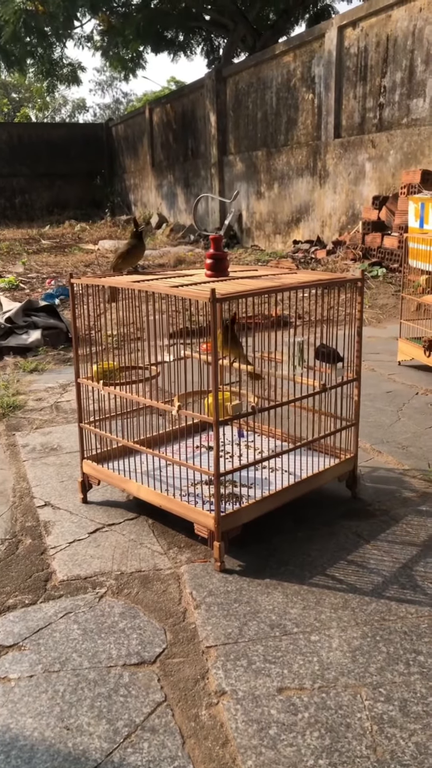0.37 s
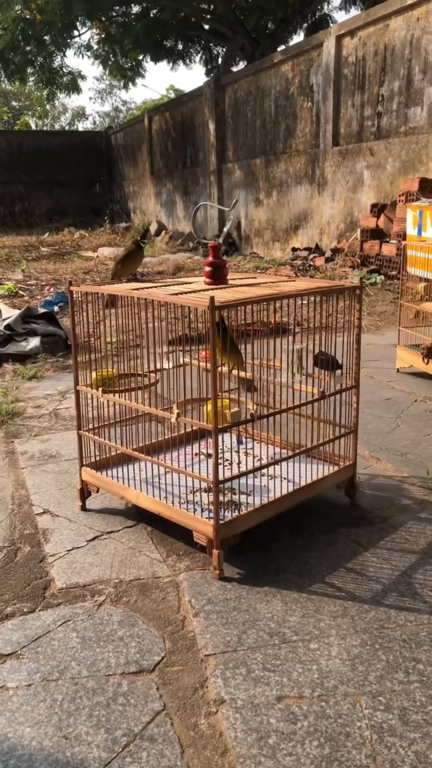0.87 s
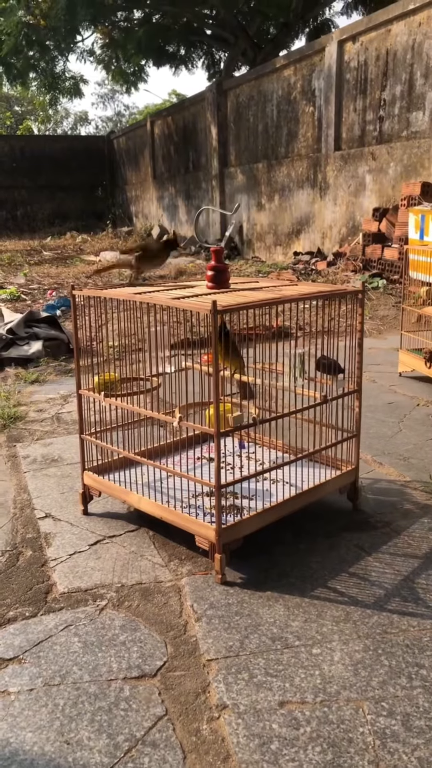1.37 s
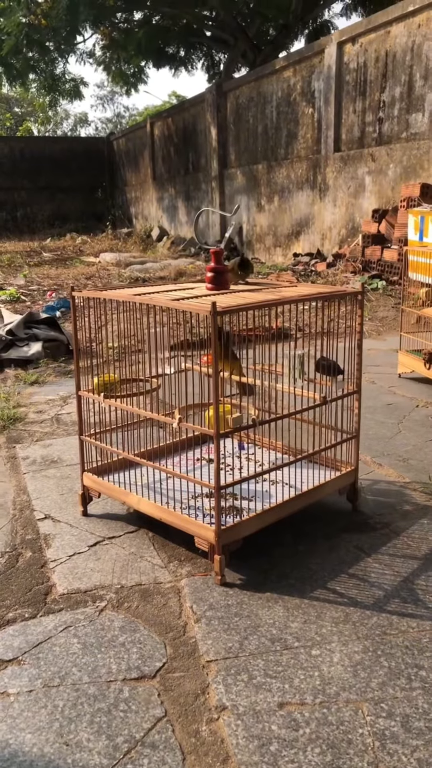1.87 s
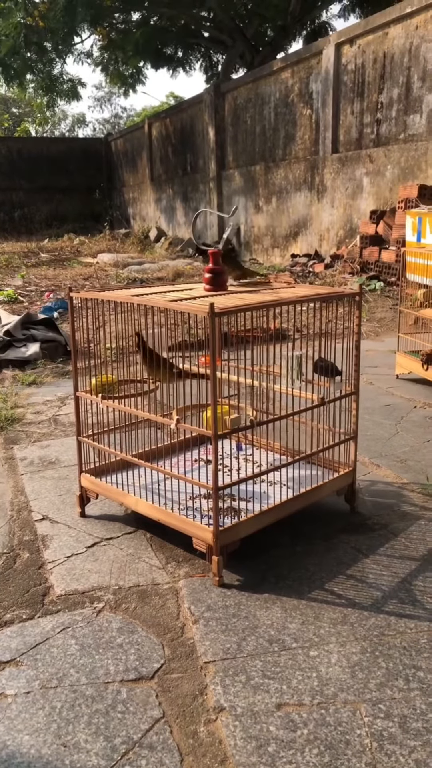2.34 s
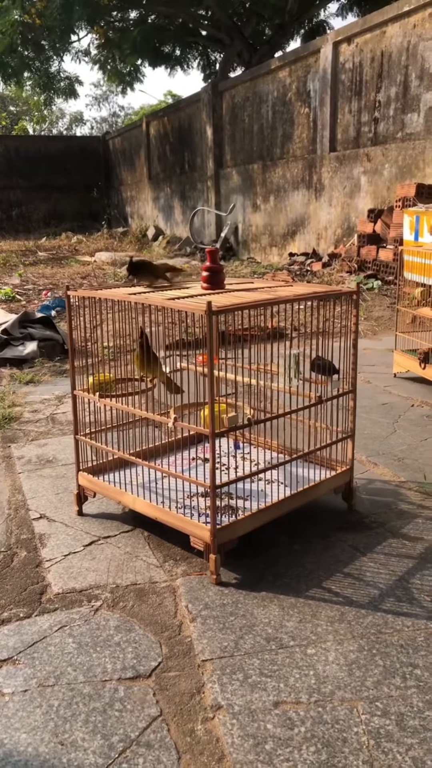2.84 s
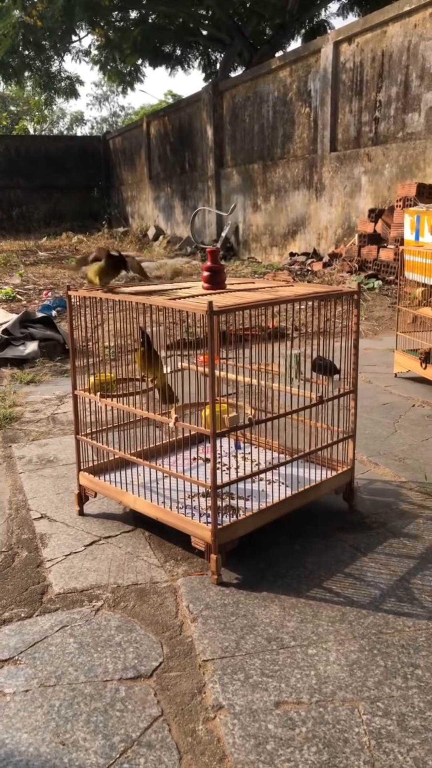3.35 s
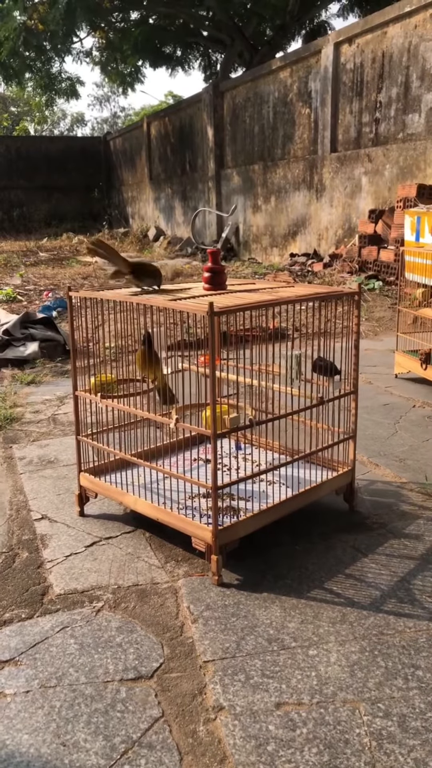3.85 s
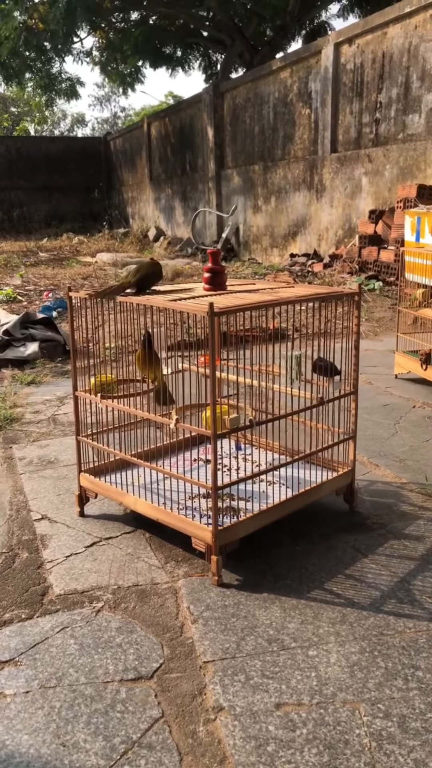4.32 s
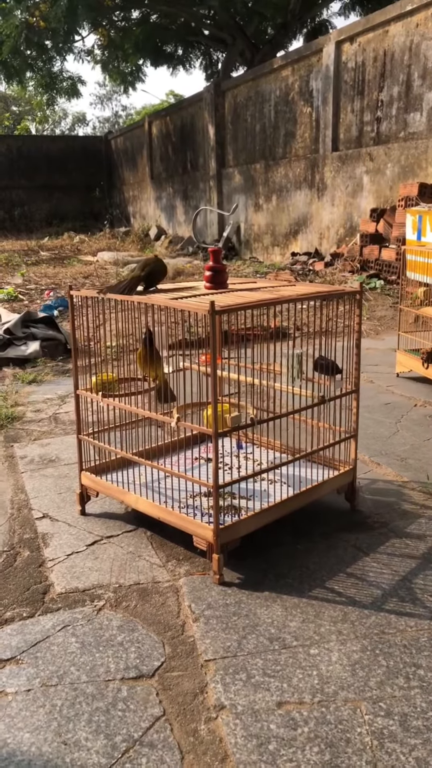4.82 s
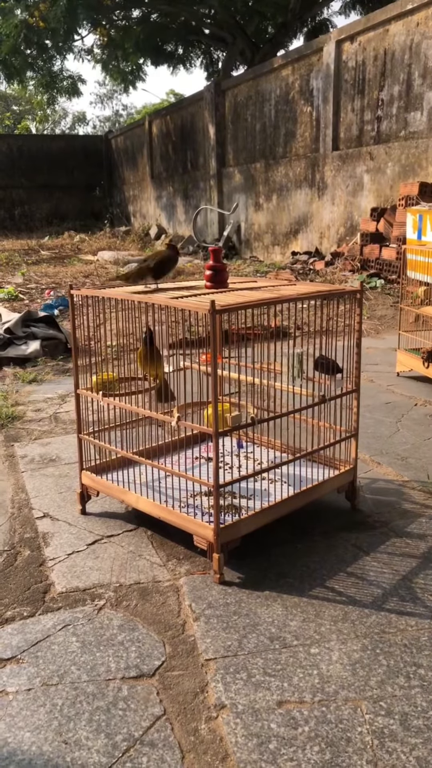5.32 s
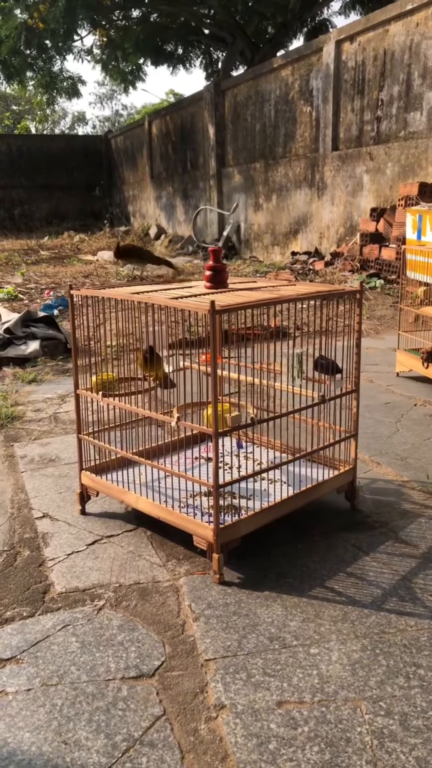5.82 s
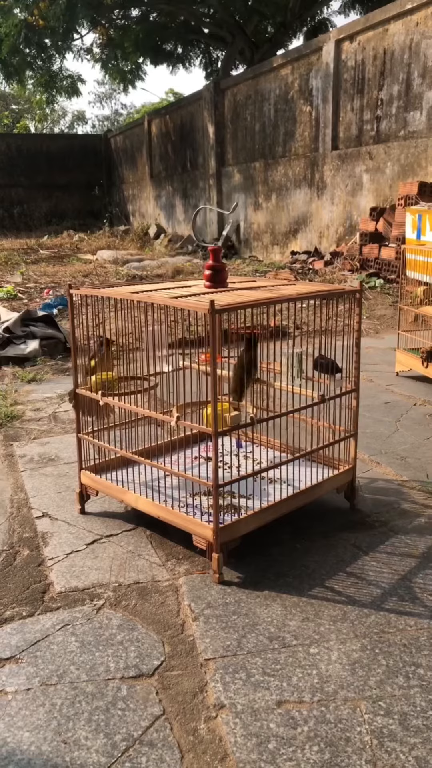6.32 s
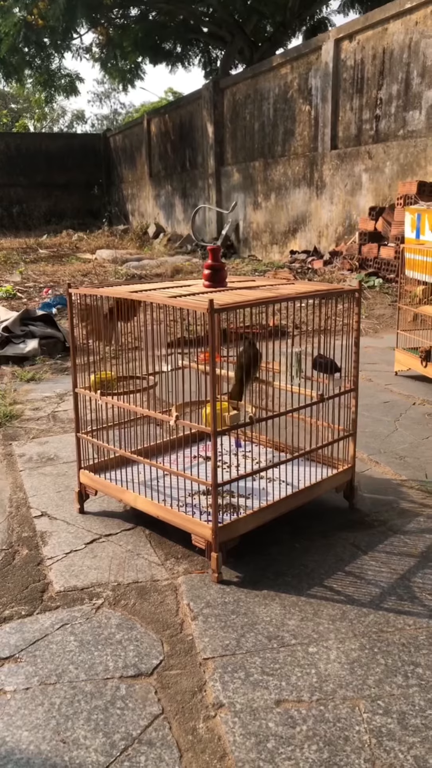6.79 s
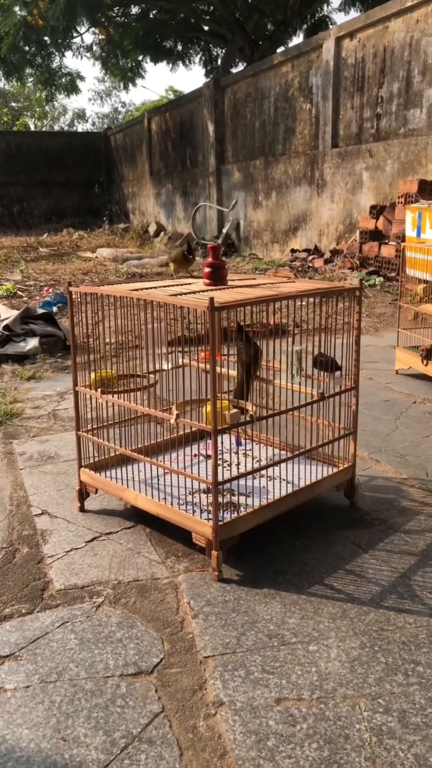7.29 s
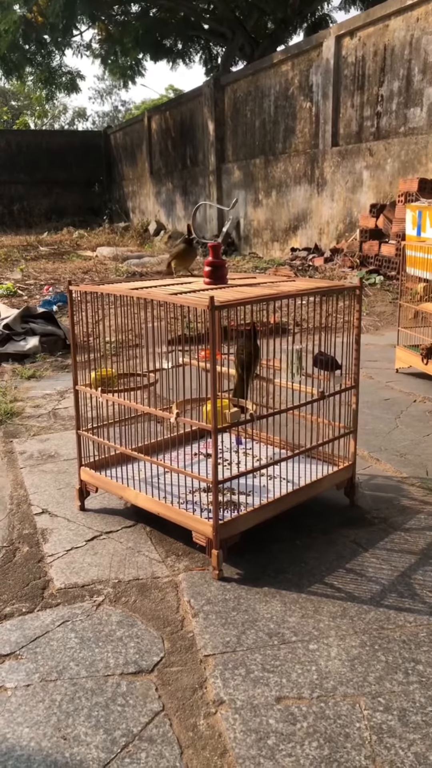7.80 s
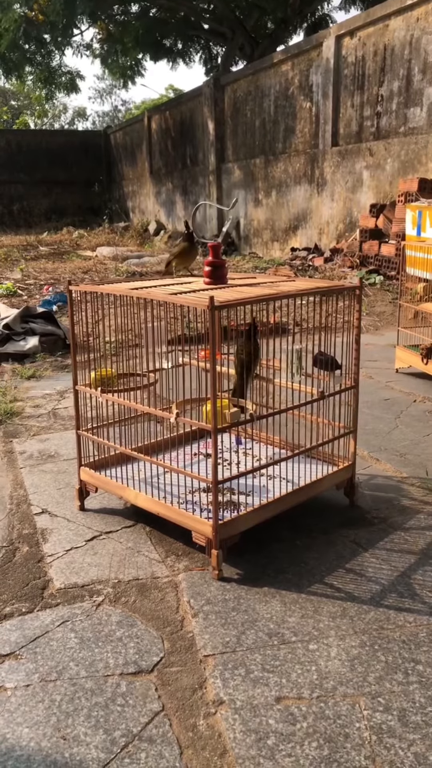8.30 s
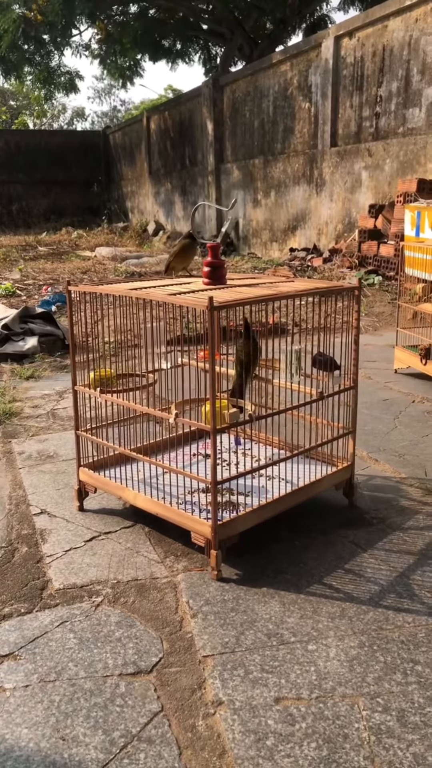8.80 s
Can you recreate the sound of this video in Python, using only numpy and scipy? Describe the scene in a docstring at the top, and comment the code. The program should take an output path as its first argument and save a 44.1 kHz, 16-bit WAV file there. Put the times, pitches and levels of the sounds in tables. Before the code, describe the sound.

Two songbirds at a cage in a paved, walled yard, heard from a few metres away. At 0-0.4 s a loud, rapid tumble of clear whistles sweeps up and down, with a soft wing thump near the end. After a pause, bubbling phrases return around 1.2-1.7 s, then only weak notes until 2.5. Short chirrups follow at 2.5-3.2, single quick calls near 3.2 and 3.55, and a phrase at 3.9-4.2. Tiny husky chips come from a far bird at 4.2-4.6. A strong liquid run fills 4.7-5.4, then faint notes and slight wing flutters until 6.9. Calls revive at 7.2-7.7 and a dense warble runs 8.1-8.7, with one last chirp at 9. Walls blur and echo each note. Beneath, low traffic rumble, wavering engines, a barely audible whine and faint leaf hiss continue, the roar slightly fuller at the end.

```python
"""Two bulbuls at a bamboo cage

Two bulbuls whistle short notes, gliding sines with overtones, in a paved yard whose walls smear and echo them.
Wings flap as short noise bursts, a small bird chips far off in rough upward flicks,
and song from far trees is a wavering band of noise. Beyond the wall traffic drones: one engine slows,
one speeds up, another idles and a thin whine passes, all unsteady sines over coloured noise for
rumble, tyre roar and leaf hiss. The treble flickers in two bands of noise."""
import sys
import numpy as np
from scipy import signal
from scipy.fft import rfft, irfft, next_fast_len
from scipy.io import wavfile
from scipy.ndimage import uniform_filter1d, map_coordinates

SR = 44100
rng = np.random.default_rng(int(sys.argv[2]) if len(sys.argv) > 2 else 0)


def linear_from_db(decibels):
    """Turn decibels (scalar or array-like) into linear amplitude factors; 0 gives 1."""
    return 10 ** (np.asarray(decibels, float) / 20)


def file_out(sig):
    """Save sig as 16-bit WAV at sys.argv[1]."""
    # one column per channel
    cols = np.atleast_2d(sig).T
    # limit, then scale
    lim = np.clip(cols, -1, 1)
    pcm = np.round(lim * 32767).astype(np.int16)
    wavfile.write(sys.argv[1], SR, pcm)


N = 403956
T = np.arange(N) / SR


def unit(x):
    """Scaled to rms 1."""
    return x / np.sqrt(np.mean(x ** 2) + 1e-20)


def along(points, hz):
    """(Hz, value) points read on a log frequency axis."""
    f, v = np.transpose(points)
    return np.interp(np.log(hz + 1), np.log(f + 1), v)


def curves(rows, t=T):
    """One value per sample for each column after the time."""
    s, *cols = np.transpose(rows)
    return [np.interp(t, s, c) for c in cols]


def wobble(rate):
    """A smooth random curve, rate knots a second."""
    t = T[::64]
    knots = rng.standard_normal(int(N * rate / SR) + 4)
    return np.interp(T, t, map_coordinates(knots, [t * rate]))


def filtered(x, response):
    """x times a response of frequency."""
    m = next_fast_len(N + 8192)
    return irfft(rfft(x, m) * response(np.fft.rfftfreq(m, 1 / SR)), m)[:N]


def rush(spectrum, patchy_db):
    """Coloured noise of rms 1 with random gain patches in time and frequency."""
    z = signal.stft(rng.standard_normal(N), nperseg=512)[2]
    field = uniform_filter1d(rng.standard_normal(z.shape), size=6, axis=0)
    field = uniform_filter1d(field, size=14, axis=1)
    noise = signal.istft(z * linear_from_db(patchy_db * unit(field)), nperseg=512)[1][:N]
    return unit(filtered(noise, lambda hz: linear_from_db(along(spectrum, hz))))


def bulbuls(edge=0.003, glide=0.0027, release=0.0058, top_hz=8800):
    """Each whistle is a gliding sine with two overtones, faded in and out; times in s."""
    # whistled notes of both birds, one list of points each: t/s, f/Hz, rms level/dB
    notes = [
        [(0.0, 2290, -10), (0.006, 2344, -29.5), (0.018, 2323, -33.5)],
        [(0.069, 3100, -65), (0.073, 2910, -43), (0.078, 2860, -35), (0.082, 2800, -27), (0.091, 2660, -31),
         (0.097, 2540, -32), (0.099, 2610, -32)],
        [(0.081, 3130, -27), (0.087, 3050, -23.5), (0.097, 2980, -24), (0.102, 2910, -24), (0.108, 2880, -19.5),
         (0.112, 2824, -26), (0.12, 2870, -26.5), (0.144, 2770, -26), (0.15, 3060, -22.5), (0.159, 3800, -23),
         (0.162, 3640, -44)],
        [(0.105, 2140, -45), (0.109, 2056, -37), (0.115, 2200, -38), (0.133, 2400, -30)],
        [(0.147, 2430, -34), (0.174, 2410, -46), (0.184, 2500, -32.5), (0.208, 2820, -22.5), (0.221, 2910, -26)],
        [(0.162, 4170, -33), (0.169, 4000, -45), (0.178, 4150, -34)],
        [(0.227, 2560, -28), (0.232, 2520, -28), (0.242, 2430, -30), (0.253, 2490, -25)],
        [(0.259, 2730, -28), (0.266, 2975, -25), (0.277, 3040, -29), (0.293, 2720, -28)],
        [(0.293, 3330, -35), (0.302, 3430, -21), (0.314, 3730, -16.5), (0.322, 3890, -18), (0.325, 4190, -23),
         (0.326, 4230, -27), (0.332, 3500, -19), (0.339, 3200, -37), (0.34, 3200, -35), (0.346, 3080, -21),
         (0.352, 2930, -21.5), (0.376, 3000, -24.5)],
        [(0.305, 2630, -33), (0.322, 2610, -29)],
        [(0.602, 2210, -51), (0.627, 2610, -42), (0.648, 2860, -41.5), (0.669, 2975, -42.5), (0.691, 2960, -47)],
        [(0.998, 1250, -46), (1.005, 1426, -59), (1.011, 1500, -52.5), (1.012, 1486, -53), (1.049, 1670, -61),
         (1.051, 1830, -51), (1.055, 1890, -43), (1.064, 2046, -43), (1.069, 2000, -42), (1.075, 1980, -46)],
        [(1.067, 2420, -62), (1.082, 2350, -46), (1.101, 2350, -53)],
        [(1.178, 2500, -50.5), (1.187, 2510, -37), (1.197, 2340, -32.5), (1.206, 2250, -34), (1.214, 2295, -34),
         (1.223, 2342, -34), (1.233, 2330, -29.5), (1.245, 2270, -32), (1.25, 2140, -35), (1.254, 2110, -39),
         (1.259, 2050, -44), (1.263, 1960, -41), (1.268, 1830, -55), (1.271, 1460, -49)],
        [(1.178, 2090, -53), (1.19, 2000, -47)],
        [(1.27, 1510, -48), (1.285, 1100, -64), (1.287, 1350, -60), (1.295, 1900, -43)],
        [(1.295, 2026, -38), (1.301, 2420, -32), (1.305, 2584, -27), (1.319, 2673, -24.5), (1.336, 2600, -23),
         (1.344, 3100, -27), (1.348, 2970, -44)],
        [(1.345, 3270, -31), (1.35, 3780, -35), (1.357, 4000, -25), (1.368, 4166, -27.5), (1.372, 4090, -29),
         (1.375, 4000, -35)],
        [(1.355, 1990, -55), (1.37, 2130, -46), (1.39, 2190, -53)],
        [(1.374, 3940, -29), (1.378, 3100, -35)],
        [(1.447, 3340, -39), (1.461, 3382, -29), (1.474, 3360, -30)],
        [(1.492, 1940, -55), (1.519, 2100, -46)],
        [(1.522, 2220, -63), (1.528, 2060, -44), (1.537, 2145, -37), (1.555, 2424, -28), (1.565, 2500, -28),
         (1.571, 2380, -28), (1.576, 2375, -30), (1.58, 2240, -31), (1.589, 2130, -40), (1.592, 2100, -42),
         (1.598, 2070, -38), (1.603, 2070, -49), (1.61, 2210, -33), (1.622, 2600, -27), (1.631, 2746, -24.5),
         (1.64, 2807, -27), (1.651, 2825, -35), (1.658, 2720, -27), (1.664, 2730, -32), (1.681, 2360, -26.5),
         (1.685, 2370, -38), (1.702, 2310, -30)],
        [(1.71, 1940, -51), (1.735, 2100, -50)],
        [(1.817, 1820, -65), (1.824, 1905, -49), (1.847, 2167, -48)],
        [(1.908, 1980, -56), (1.916, 2000, -50), (1.938, 2100, -57)],
        [(1.981, 1920, -53), (1.993, 2000, -45), (2.014, 2115, -56)],
        [(2.064, 1920, -53), (2.079, 1984, -42.5), (2.092, 1980, -62)],
        [(2.196, 2380, -54), (2.203, 2350, -52), (2.221, 2280, -52), (2.231, 2220, -49.5)],
        [(2.215, 1970, -50), (2.224, 1590, -57)],
        [(2.236, 2602, -58), (2.247, 3100, -54)],
        [(2.248, 2220, -58), (2.261, 3010, -47), (2.276, 3480, -55)],
        [(2.276, 3760, -60), (2.282, 3710, -43), (2.294, 3980, -50), (2.299, 4170, -40), (2.302, 4130, -38)],
        [(2.291, 1940, -57), (2.314, 1865, -44.5), (2.329, 1990, -38), (2.341, 2090, -41)],
        [(2.303, 3830, -44), (2.308, 2600, -40)],
        [(2.312, 2280, -44), (2.322, 3550, -44), (2.335, 4400, -40.5), (2.346, 4650, -52)],
        [(2.486, 1830, -55), (2.493, 1860, -45), (2.513, 1660, -47), (2.534, 2150, -33), (2.541, 2213, -33.5),
         (2.553, 2130, -36), (2.562, 2195, -43)],
        [(2.556, 2010, -42), (2.562, 1500, -52)],
        [(2.598, 2580, -61), (2.604, 2400, -58), (2.61, 2600, -37), (2.616, 2570, -30), (2.633, 2600, -28),
         (2.639, 2675, -30), (2.646, 2640, -25), (2.653, 2690, -47)],
        [(2.654, 2920, -55), (2.664, 2500, -31), (2.672, 1880, -36)],
        [(2.673, 1480, -60), (2.683, 1900, -38), (2.689, 2120, -37), (2.698, 2280, -30.5), (2.707, 2350, -27.5),
         (2.718, 2150, -36), (2.725, 2280, -41)],
        [(2.722, 1920, -38), (2.73, 1410, -66)],
        [(2.802, 3570, -58), (2.812, 3360, -34), (2.817, 3190, -31), (2.827, 3010, -30), (2.832, 2730, -32),
         (2.836, 2610, -25.5), (2.845, 2540, -30), (2.85, 2720, -39)],
        [(2.85, 3030, -13), (2.853, 3190, -34), (2.859, 3360, -23.5), (2.863, 3340, -24), (2.867, 3343, -41)],
        [(2.914, 2360, -35), (2.93, 2217, -29.5), (2.942, 2167, -34), (2.954, 2220, -35), (2.959, 2310, -29)],
        [(2.96, 2020, -38), (2.966, 1640, -52), (2.973, 1250, -60)],
        [(2.974, 1900, -49), (2.982, 1200, -54)],
        [(2.986, 1530, -56), (2.995, 1970, -35.5), (2.999, 2270, -31), (3.004, 2410, -30.5), (3.011, 2720, -28),
         (3.016, 2860, -51), (3.02, 2915, -24), (3.026, 3030, -35), (3.037, 3230, -32), (3.041, 3210, -35),
         (3.047, 3190, -22), (3.052, 3340, -38)],
        [(3.173, 2500, -55), (3.178, 2730, -38), (3.184, 2830, -30), (3.19, 3020, -39), (3.194, 3430, -38),
         (3.197, 2930, -36), (3.2, 2190, -34), (3.201, 2450, -40), (3.205, 2650, -34), (3.213, 2600, -30.5),
         (3.221, 2600, -42)],
        [(3.537, 2610, -55), (3.543, 2800, -39), (3.549, 2830, -32), (3.555, 3000, -21), (3.559, 3370, -32),
         (3.562, 2880, -43), (3.565, 2170, -41), (3.566, 2400, -38), (3.569, 2630, -30), (3.578, 2610, -31.5),
         (3.587, 2680, -49)],
        [(3.899, 2800, -63), (3.903, 2600, -52), (3.914, 2565, -32), (3.92, 2500, -31.5), (3.938, 2463, -32),
         (3.953, 2580, -25.5), (3.979, 3050, -23), (3.991, 3010, -33)],
        [(4.041, 2466, -31), (4.078, 2324, -31.5), (4.098, 2402, -27.5), (4.107, 2370, -32)],
        [(4.102, 2300, -49), (4.114, 1490, -45)],
        [(4.126, 1700, -53), (4.14, 1980, -41), (4.164, 1983, -36), (4.171, 1915, -73)],
        [(4.334, 1480, -58), (4.345, 1740, -55)],
        [(4.375, 1918, -51), (4.39, 1504, -54), (4.396, 1425, -61), (4.413, 1650, -45), (4.416, 1880, -50),
         (4.428, 1975, -38.5), (4.436, 1970, -43)],
        [(4.475, 1574, -49), (4.49, 1680, -53)],
        [(4.632, 2030, -59), (4.641, 1980, -42), (4.648, 2002, -65)],
        [(4.655, 1580, -53), (4.665, 1550, -55), (4.68, 1770, -52)],
        [(4.662, 2600, -62), (4.666, 2770, -26.5), (4.677, 2860, -24.5), (4.681, 2730, -33)],
        [(4.695, 1886, -49), (4.715, 1836, -57), (4.721, 2030, -47), (4.725, 2310, -37)],
        [(4.72, 1966, -64), (4.725, 2460, -29), (4.732, 2830, -20), (4.738, 2964, -27), (4.749, 2960, -46)],
        [(4.812, 1870, -48), (4.822, 2020, -44), (4.87, 2540, -24.5), (4.879, 2470, -31), (4.882, 2300, -38)],
        [(4.883, 2200, -47), (4.89, 1510, -56), (4.897, 1290, -51), (4.905, 1600, -61), (4.909, 1610, -59),
         (4.916, 1660, -44), (4.925, 1650, -47)],
        [(4.907, 3420, -56), (4.916, 3300, -37), (4.922, 3200, -46), (4.927, 3226, -31), (4.936, 3090, -23),
         (4.957, 2740, -21.5), (4.975, 2480, -23), (4.981, 2520, -30), (4.987, 2730, -23), (4.993, 2800, -17.5),
         (5.008, 2930, -38)],
        [(4.99, 2390, -34), (4.997, 2320, -29), (5.006, 2310, -27), (5.014, 2270, -30.5), (5.047, 2260, -32.5),
         (5.064, 2390, -23), (5.07, 2390, -26), (5.075, 2550, -18.5), (5.082, 2573, -24), (5.106, 2574, -26)],
        [(5.108, 2700, -28), (5.118, 2350, -38.5), (5.13, 2080, -41)],
        [(5.131, 2090, -40), (5.145, 1940, -48), (5.151, 2000, -44), (5.154, 2250, -48)],
        [(5.156, 2778, -19.5), (5.168, 2890, -45)],
        [(5.165, 3400, -49), (5.183, 3470, -24), (5.187, 3370, -26), (5.193, 3120, -19), (5.201, 2850, -32),
         (5.205, 2810, -50), (5.207, 2900, -42), (5.211, 2860, -36), (5.222, 2500, -20), (5.232, 2275, -31),
         (5.241, 2183, -27.5), (5.25, 2030, -34.5), (5.274, 1920, -34), (5.295, 1960, -35),
         (5.308, 2037, -33.5), (5.341, 2390, -29), (5.353, 2630, -29)],
        [(5.371, 2654, -34), (5.388, 2630, -36), (5.401, 2630, -29)],
        [(5.57, 2060, -61), (5.59, 2500, -59)],
        [(5.796, 1960, -57), (5.838, 2550, -52.5), (5.847, 2410, -70)],
        [(5.983, 1910, -53), (6.001, 2140, -52), (6.016, 2350, -51)],
        [(6.203, 1800, -63), (6.233, 2100, -54), (6.236, 2140, -62), (6.25, 2280, -50), (6.256, 2130, -63)],
        [(6.289, 1950, -52), (6.302, 2200, -55), (6.307, 2000, -60)],
        [(6.3, 2120, -56), (6.325, 2530, -56)],
        [(6.344, 2250, -58), (6.352, 2500, -48.5), (6.38, 2400, -61)],
        [(6.51, 1924, -53), (6.522, 2200, -55)],
        [(6.524, 2410, -64), (6.536, 2260, -47), (6.542, 2500, -62), (6.543, 2320, -49), (6.566, 2450, -53)],
        [(6.57, 1690, -58), (6.607, 2140, -47), (6.618, 2200, -45)],
        [(6.754, 2390, -56), (6.763, 2530, -43), (6.774, 2820, -45.5), (6.78, 3160, -44)],
        [(6.778, 2100, -53), (6.785, 1715, -44)],
        [(6.789, 3630, -51), (6.795, 3630, -52), (6.798, 4020, -58), (6.81, 4010, -55)],
        [(6.874, 2164, -62), (6.881, 1920, -44), (6.887, 1870, -40), (6.893, 2180, -36), (6.898, 2330, -29),
         (6.904, 2360, -35), (6.907, 2270, -37)],
        [(7.095, 1300, -50), (7.113, 1510, -53), (7.115, 1580, -51), (7.122, 1700, -40), (7.13, 1780, -48),
         (7.163, 1670, -43), (7.185, 1790, -47), (7.19, 1840, -47)],
        [(7.122, 2020, -55), (7.142, 2460, -53)],
        [(7.164, 2370, -62), (7.169, 2610, -56), (7.179, 2550, -51), (7.19, 2696, -39), (7.193, 2610, -45)],
        [(7.19, 2170, -30.5), (7.197, 2720, -45), (7.202, 2420, -46), (7.205, 2400, -49)],
        [(7.261, 1620, -47), (7.267, 1790, -46), (7.276, 1925, -38), (7.288, 1960, -36), (7.302, 2000, -37),
         (7.308, 2120, -39), (7.312, 2110, -32), (7.318, 2190, -39), (7.323, 2180, -34), (7.33, 2780, -36),
         (7.332, 2670, -47)],
        [(7.327, 3120, -53), (7.329, 3130, -26), (7.335, 2780, -39), (7.339, 2740, -37), (7.347, 2750, -24),
         (7.351, 2410, -25), (7.354, 2150, -33)],
        [(7.355, 1870, -50), (7.36, 1430, -57)],
        [(7.372, 1450, -57), (7.388, 1860, -41)],
        [(7.473, 2490, -31.5), (7.493, 2390, -25.5), (7.508, 2402, -30), (7.511, 2410, -20)],
        [(7.522, 2650, -28), (7.525, 2350, -32), (7.534, 2290, -24), (7.538, 2200, -33), (7.549, 2222, -24.5),
         (7.562, 2228, -28), (7.571, 2240, -32)],
        [(7.6, 1800, -75), (7.611, 1880, -45)],
        [(7.612, 1934, -40), (7.621, 2040, -40), (7.627, 2100, -33), (7.633, 2283, -31), (7.646, 2450, -27),
         (7.651, 2210, -29), (7.655, 1980, -37), (7.661, 1960, -37), (7.667, 1910, -41), (7.684, 1822, -40)],
        [(7.895, 2240, -52), (7.913, 2350, -41), (7.924, 2590, -39), (7.932, 2820, -28), (7.941, 2960, -34),
         (7.944, 2950, -36)],
        [(8.101, 1780, -53), (8.107, 1856, -41), (8.115, 2220, -36), (8.127, 2403, -24), (8.134, 2396, -31),
         (8.139, 2560, -35), (8.143, 2620, -40), (8.159, 2805, -26.5), (8.165, 2903, -23), (8.174, 2990, -29),
         (8.185, 2734, -23), (8.191, 2510, -37), (8.201, 2380, -35.5), (8.225, 2235, -33), (8.236, 2230, -33),
         (8.239, 2220, -37), (8.245, 2160, -28.5), (8.251, 2090, -32), (8.255, 2150, -35), (8.27, 2100, -30)],
        [(8.136, 2110, -46), (8.161, 1810, -37)],
        [(8.255, 1820, -50), (8.275, 1450, -61)],
        [(8.278, 2124, -32), (8.285, 2036, -37), (8.288, 1805, -39), (8.291, 2075, -35), (8.299, 2155, -26),
         (8.303, 2370, -28.5), (8.317, 2750, -34)],
        [(8.32, 2370, -29), (8.327, 2370, -34), (8.332, 2320, -33)],
        [(8.321, 2860, -29), (8.327, 2930, -35), (8.333, 2880, -25)],
        [(8.356, 2790, -31), (8.361, 2870, -41), (8.373, 2970, -36)],
        [(8.357, 2130, -26), (8.364, 2290, -33), (8.378, 2340, -32), (8.384, 2396, -28), (8.39, 2260, -35)],
        [(8.39, 1830, -36), (8.396, 1800, -47), (8.412, 1785, -39)],
        [(8.424, 3010, -32), (8.432, 2940, -26), (8.444, 2873, -22.5), (8.454, 2906, -21.5),
         (8.472, 3100, -23.5), (8.484, 3400, -31), (8.499, 3700, -20), (8.508, 3763, -18), (8.517, 3810, -28)],
        [(8.513, 3470, -42), (8.522, 3120, -20)],
        [(8.537, 2740, -24), (8.547, 2660, -34), (8.55, 2700, -35), (8.563, 2964, -30), (8.578, 2980, -39),
         (8.581, 2830, -28), (8.587, 2690, -34), (8.601, 2570, -33.5), (8.623, 2220, -31), (8.631, 2050, -48),
         (8.637, 2075, -27), (8.643, 2220, -36), (8.649, 2500, -27), (8.653, 2950, -38), (8.664, 3360, -32),
         (8.668, 3660, -39), (8.673, 3620, -51), (8.677, 3320, -27), (8.682, 2860, -32)],
        [(8.659, 2230, -46), (8.664, 2360, -30), (8.671, 2440, -36), (8.677, 2604, -38), (8.683, 2700, -40),
         (8.691, 2615, -23), (8.694, 2500, -35)],
        [(8.692, 2760, -41), (8.697, 2720, -26.5), (8.703, 2770, -31), (8.712, 2820, -39), (8.713, 2760, -40)],
        [(8.701, 2430, -34), (8.706, 2480, -33), (8.71, 2420, -31), (8.715, 2500, -34)],
        [(9.01, 2070, -44), (9.013, 2280, -41), (9.016, 2594, -32), (9.036, 2530, -43)],
    ]
    # overtones of each note in the same order: 2nd level/dB, 3rd level/dB, against the softened swell below
    overtone_levels = [(-46, -41), (-46, -52), (-40.5, -43), (-48, -22.5), (-38, -46), (-15, -44),
                       (-32, -37), (-53, -50), (-34, -53), (-37, -33), (-35, -44), (-20, -30), (-35, -33),
                       (-47, -36), (-26, -25), (-29, -24), (-43, -42), (-23.5, -50), (-30, -50), (-49, -50),
                       (-38, -52), (-24, -26), (-40, -36), (-27, -29), (-23, -28), (-23, -22), (-26, -27),
                       (-33, -33), (-24, -42), (-22, -23), (-31, -40), (-25, -40), (-37, -36), (-30, -36),
                       (-50, -33), (-50, -50), (-34, -37), (-27, -50), (-33, -50), (-51, -50), (-39, -43),
                       (-22, -29), (-31, -50), (-52, -53), (-47, -54), (-50, -35), (-26, -24), (-34, -55),
                       (-42, -41), (-48, -50), (-41, -50), (-43, -29), (-50, -50), (-25, -23), (-30, -40),
                       (-17, -25), (-9, -25), (-26, -41.5), (-23, -55), (-42, -54), (-11, -18), (-48, -50),
                       (-38, -37), (-34, -50), (-42, -35.5), (-46, -54), (-32, -30), (-7, -37), (-46, -48),
                       (-40, -40), (-28, -38), (-9, -35), (-20, -33), (-15, -15), (-24, -28), (-20, -28),
                       (-25, -28), (-11, -40), (-50, -52), (-5, -50), (-36, -30), (-40, -38), (-19, -25),
                       (-22, -27), (-44, -50), (-18, -38), (-50, -28), (-20, -38), (-50, -47), (-29, -42),
                       (-47, -45), (-33, -45), (-21, -50), (-48, -51), (-52, -54), (-50, -50), (-44, -45),
                       (-42, -46), (-38, -40), (-31, -46), (-50, -26), (-35, -38), (-34, -26), (-47, -46),
                       (-39, -50), (-46, -46), (-27, -33), (-34, -55), (-46, -50), (-42, -41), (-35, -31),
                       (-44, -47), (-50, -63), (-41, -42)]
    out = np.zeros(N + SR)
    for note, overtones in zip(notes, overtone_levels):
        start = max(note[0][0] - edge, 0)
        t = np.arange(start, note[-1][0] + release, 1 / SR)
        smooth = int(glide * SR) + 1
        hz, db = (uniform_filter1d(c, size=smooth, mode="nearest") for c in curves(note, t))
        # the fades last twice edge and twice release
        fade = np.clip(np.minimum((t - t[0]) / edge, (t[-1] - t) / release) / 2, 0, 1)
        phase = 2 * np.pi * np.cumsum(hz) / SR
        tone = linear_from_db(db) * np.sin(phase)
        # the throat favours the whistle itself, so overtones follow only part of its swells
        under_db = db.max() - 3 + 0.6 * (db - db.max())
        for k, level in zip(range(2, 4), overtones):
            rolloff = 1 / (1 + (k * hz / top_hz) ** 20)
            tone += linear_from_db(under_db + level) * rolloff * np.sin(k * phase)
        out[round(start * SR):][:len(t)] += np.sqrt(2) * np.sin(fade * np.pi / 2) ** 2 * tone
    return out[:N]


def wing_flaps(t60=0.02, octaves=0.99):
    """Wing flaps: short ticks, each a broad noise burst around its centre, decaying by t60 in s."""
    # flaps: t/s, level/dB (halved in the burst below), centre f/Hz
    flaps = [(0.346, -29.5, 789), (4.217, -46, 4870), (4.334, -42.5, 4000), (5.508, -44, 8000),
             (5.543, -53, 5900), (6.85, -49, 5560)]
    out, t = np.zeros(N), np.arange(1024) / SR
    hz = np.fft.rfftfreq(len(t), 1 / SR) + 1
    for s, db, centre_hz in flaps:
        band = np.exp(-(np.log2(hz / centre_hz) / octaves) ** 2)
        burst = irfft(rfft(rng.standard_normal(len(t))) * band)
        out[round(s * SR):][:len(t)] += linear_from_db(db - 60 * t / t60) * unit(burst) / 2
    return out


def far_bird(length=0.072, flick_hz=900, rough=0.13):
    """A husky chip, length in s: a sine with jittered phase that swells and flicks upward at its end."""
    # far chips: t/s (at 60 % of the chip), f/Hz before the flick, peak level/dB
    chips = [(4.205, 6230, -53.5), (4.365, 6120, -52.5), (4.48, 6200, -52.5), (4.612, 6150, -55)]
    out, u = np.zeros(N), np.arange(int(length * SR)) / (length * SR)
    for s, hz, db in chips:
        glide = 2 * np.pi * np.cumsum(hz + flick_hz * u ** 6) / SR
        husk = np.cumsum(rng.normal(0, rough, len(u)))
        swell = np.sin(np.pi * u ** 1.13) ** 2
        out[round((s - length * 0.6) * SR):][:len(u)] += linear_from_db(db) * swell * np.sin(glide + husk)
    return out


def yard(x, tail_db, far_db, onset=0.016):
    """Wall echoes: quick near and weak slow far tails, with a new random tail every quarter second, crossfaded."""
    # decay of the yard: f/Hz, near walls t60/s, far walls t60/s
    decay = [(1200, .22, .7), (2500, 0.17, 0.73), (4000, 0.13, 0.58), (9000, 0.17, 0.35)]
    # single echoes: delay t/s, level/dB
    walls = [(.012, -14), (.047, -27.5), (.062, -25.5), (0.124, -34), (.146, -35.5)]
    out = np.zeros(N + SR)
    hop = SR // 4
    band_hz, near_t60, far_t60 = np.transpose(decay)
    for start in range(0, N + hop, hop):
        hz, t, z = signal.stft(rng.standard_normal(SR // 2), SR, nperseg=256)
        near, far = (linear_from_db(-60 * t / np.interp(hz, band_hz, t60)[:, None]) for t60 in (near_t60, far_t60))
        tail = signal.istft(z * (near + linear_from_db(far_db) * far), SR, nperseg=256)[1]
        tail *= 1 - np.exp(-np.arange(len(tail)) / (onset * SR))  # the first reflections need time to arrive
        tail *= linear_from_db(tail_db) / np.linalg.norm(tail)
        for delay, db in walls:
            tail[round(delay * SR)] += linear_from_db(db)
        first = max(start - hop, 0)
        window = np.hanning(2 * hop)[max(hop - start, 0):][:N - first]
        wet = signal.fftconvolve(x[first:start + hop] * window, tail)
        out[first:][:len(wet)] += wet
    return out[:N]


def far_song(spread_hz=180):
    """Birds in far trees: whistles blurred by many echoes into a wavering band of noise around a sine."""
    # blurred song: t/s, centre f/Hz, rms level/dB
    song_path = [(.7, 2700, -78), (.8, 2680, -63), (.97, 2770, -56), (1.05, 2500, -67), (1.15, 2360, -53),
                 (1.23, 2980, -56), (1.33, 3650, -65), (1.4, 3675, -84), (2.55, 4000, -87),
                 (2.63, 4000, -64), (2.73, 4120, -60), (2.77, 3900, -62), (2.82, 3798, -80),
                 (5.38, 2670, -81), (5.43, 2660, -53), (5.53, 2670, -57.5), (5.68, 2685, -82),
                 (6.78, 3830, -78), (6.84, 3900, -61), (6.9, 3700, -80)]
    hz, db = curves(song_path)
    blur = rush([(1, 0), (spread_hz, -3), (3 * spread_hz, -30), (6 * spread_hz, -120)], patchy_db=2.0)
    return np.sqrt(2) * linear_from_db(db) * blur * np.sin(2 * np.pi * np.cumsum(hz) / SR)


def drone(track, orders, drift, sway_db):
    """Sines on multiples of a moving rate, swaying in phase (rad) and level, silent outside the track."""
    hz, db = curves(track)
    phase = 2 * np.pi * np.cumsum(hz) / SR
    inside = np.clip(np.minimum(T - track[0][0], track[-1][0] - T) / 0.082 + 1, 0, 1)
    lines = np.zeros(N)
    for k, level in orders:
        gain = linear_from_db(level + sway_db * wobble(5))
        lines += gain * np.sin(k * phase + drift * np.sqrt(k) * wobble(4))
    return np.sqrt(2) * linear_from_db(db) * inside * lines


def engines():
    """Three engines sound multiples of their firing rates: one slows, one speeds up, one idles."""
    # engine paths: t/s, firing rate f/Hz, base level/dB
    slowing, speeding, idling = [(0, 36.63, -58), (.5, 35.14, -46), (1.3, 32.27, -50.5), (2, 30.8, -40),
                                 (3, 28.91, -45.5), (3.7, 28.17, -46.5), (4.6, 26.75, -53)], [(5.6, 36, -54.5), (6.5, 37.93, -45), (7.3, 39.23, -47),
                                                  (8.2, 40.6, -40.5), (9.16, 41.5, -42)], [(0, 28.21, -37), (1, 28.29, -42),
                                                                    (2.2, 30, -42), (3.5, 29.02, -37),
                                                                    (5, 28.96, -43), (6.3, 30.11, -41),
                                                                    (7.8, 29.62, -40.5), (9.16, 29.64, -48)]
    # exhaust orders: multiple of the firing rate, level/dB against the base, before the sway
    slowing_orders = [(3, 2.5), (4, -0.5), (5, -4), (6, -8.5), (7, -15.5), (8, -17), (11, -19.5), (17, -27)]
    speeding_orders = [(3, -6), (4, -1), (5, -6.5), (8, -25), (9, -17), (11, -17.5), (12, -23)]
    idling_orders = [(2, 0.5), (3, -6), (4, -10), (7, -26.5)]
    slower = drone(slowing, slowing_orders, drift=0.58, sway_db=3.5)
    faster = drone(speeding, speeding_orders, drift=0.63, sway_db=4)
    idle = drone(idling, idling_orders, drift=0.65, sway_db=3.0)
    return slower + faster + idle


def whine():
    """A thin far whine: one sine whose phase and level sway."""
    # whine path: t/s, guide f/Hz (it sounds at 0.99 of this), level/dB before the sway
    whine_path = [(4.7, 1325, -81), (4.82, 1325, -62), (5, 1299, -86), (5.4, 1364, -66), (5.7, 1392, -75),
                  (6, 1343, -67), (6.6, 1322, -65.5), (7.1, 1320, -57), (7.3, 1287, -69)]
    return drone(whine_path, [(0.99, 0)], drift=4.0, sway_db=3.0)


def road():
    """Rumble, tyre roar and leaf hiss: three coloured noises under slowly moving levels."""
    # road levels: t/s, rumble level/dB, roar level/dB and hiss level/dB before their trims
    road_levels = [(0.0, -40, -54, -68.5), (0.71, -40, -52, -69), (1.07, -43, -51, -68),
                   (1.71, -38, -49.5, -65), (3.06, -44.5, -53, -69), (3.85, -38.5, -52.5, -70.5),
                   (4.33, -41, -50, -71), (4.39, -38.5, -51, -71.5), (4.97, -38.5, -51.5, -70),
                   (5.1, -36.5, -53.5, -69), (5.51, -38, -50, -71), (5.92, -38.5, -51, -70),
                   (6.1, -36, -49, -69), (7.06, -36, -49.5, -69), (8.14, -38.5, -46, -64),
                   (8.47, -36, -47, -64.5), (9.16, -36, -46, -64.5)]
    # noise colours: f/Hz, relative level/dB per Hz
    rumble_colour, roar_colour, hiss_colour = [(30, -33.5), (40, -21), (50, 3), (62, 7.5), (75, 0),
                                               (100, 0), (160, -3), (210, -15), (300, -23), (400, -63)], [(120, -27), (200, 1), (228, -3.5),
                                                               (339, -4.5), (503, -11.5), (894, -15.5),
                                                               (1300, -22), (2220, -26), (3500, -37.5),
                                                               (4550, -52.5), (7700, -120)], [(1470, -26.5), (2500, 5),
                                                                             (3080, -2), (3350, -4),
                                                                             (5070, -5), (6150, -5.5),
                                                                             (7110, -10), (9530, -10),
                                                                             (11400, -29), (15700, -24)]
    rumble_db, roar_db, hiss_db = curves(road_levels)
    rumble = linear_from_db(rumble_db) * rush(rumble_colour, patchy_db=-0.1)
    roar = linear_from_db(roar_db + 0.51) * rush(roar_colour, patchy_db=1.56)
    leaves = linear_from_db(hiss_db + 4.5) * rush(hiss_colour, patchy_db=0.6)
    return rumble + roar + leaves


def flicker(patchy_db=2.0):
    """Treble hiss that comes and goes in two bands of noise, most while the birds sing."""
    # flicker levels: t/s, lower band level/dB, upper band level/dB, both before the wobble
    treble_levels = [(0.0, -56, -71), (0.05, -73, -81), (0.1, -60, -53), (0.12, -46, -52.5),
                     (0.2, -64, -69), (0.28, -64, -59), (0.3, -49, -62.5), (0.43, -83, -91.5),
                     (1.15, -80, -83), (1.22, -60, -68), (1.28, -72, -78), (1.33, -64, -56),
                     (1.38, -66, -78.5), (1.43, -76, -74.5), (1.6, -63.5, -67), (1.84, -76, -79),
                     (2.27, -79, -82), (2.32, -63, -76), (2.45, -84, -79), (2.55, -61, -69),
                     (2.73, -64, -79), (2.85, -63, -59), (2.88, -83, -75), (2.93, -54, -77),
                     (3.09, -85, -77), (3.34, -69.5, -76), (3.88, -102.5, -82), (3.95, -66, -67),
                     (4.0, -82, -82), (4.06, -63.5, -77), (4.31, -80, -83), (4.44, -73, -77),
                     (4.57, -94, -99), (4.72, -65.5, -68), (4.8, -89, -85), (4.85, -62.5, -69),
                     (4.95, -76, -63.5), (5.07, -57.5, -64), (5.18, -70, -62), (5.23, -49.5, -58),
                     (5.28, -61, -80), (5.33, -55, -68), (5.38, -63, -61), (5.49, -81, -84),
                     (5.51, -66, -72), (5.61, -87, -86), (5.99, -75, -76), (6.38, -85, -89),
                     (6.89, -72, -72), (7.02, -86, -80), (7.19, -61, -72), (7.24, -83, -84),
                     (7.3, -54, -81), (7.35, -63, -71), (7.42, -78, -85), (7.53, -57, -72), (7.8, -78, -79),
                     (8.06, -75, -74), (8.14, -62, -62.5), (8.21, -69, -70.5), (8.27, -60, -64.5),
                     (8.42, -65, -67), (8.47, -79, -58), (8.49, -52, -59), (8.57, -71, -69.5),
                     (8.65, -61, -63), (8.8, -75, -78), (9.16, -76, -78.5)]
    lower_db, upper_db = curves(treble_levels)
    lower = rush([(9600, -120), (10300, -3), (11000, -1), (13200, -3), (13900, -27), (14500, -120)], patchy_db)
    upper = rush([(12000, -120), (12700, -27.5), (13400, -4), (14500, 11), (15800, -8)], patchy_db)
    return linear_from_db(lower_db + 2.9 * wobble(25)) * lower + linear_from_db(upper_db + 2.5 * wobble(25)) * upper


def scene():
    """Near sounds and their yard echoes over the far trees and road."""
    near = bulbuls() + wing_flaps() + far_bird()
    echoes = yard(near, tail_db=-10.5, far_db=-18.5)
    traffic = engines() + whine() + road()
    return (near + echoes + far_song() + traffic + flicker())[None]


def top_cut(x):
    """Nothing passes above the cut-off."""
    return signal.sosfilt(signal.butter(12, 16400, fs=SR, output="sos"), x)


def record(dry):
    """The whole mix, a little dull around 9 kHz and cut off above 15.83 kHz."""
    def response(hz):
        dip_db = -5 * np.exp(-((hz - 9300) / 550) ** 4)
        return linear_from_db(dip_db) * (hz < 15830)

    dull = filtered(dry[0], response)
    return top_cut(dull[None])


dry = scene()
out = record(dry)
file_out(out)
```